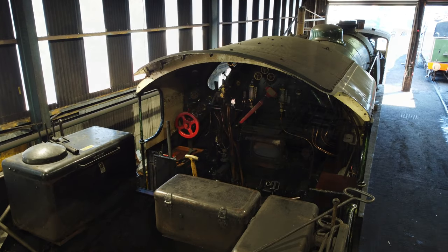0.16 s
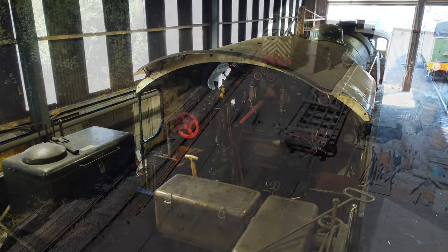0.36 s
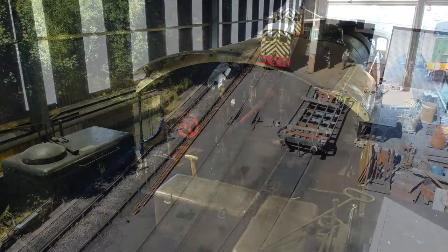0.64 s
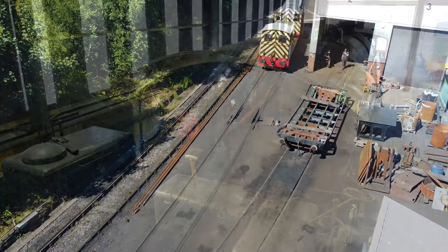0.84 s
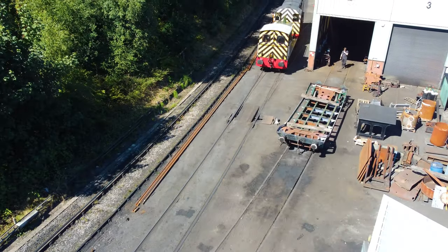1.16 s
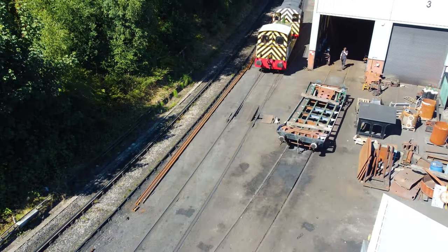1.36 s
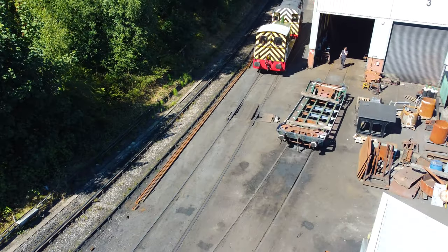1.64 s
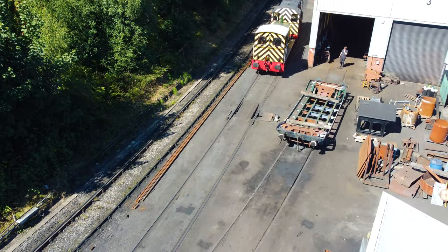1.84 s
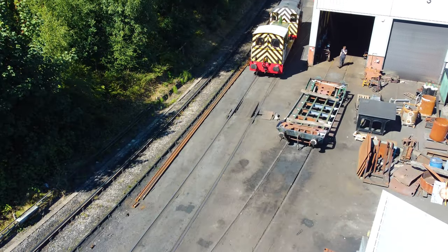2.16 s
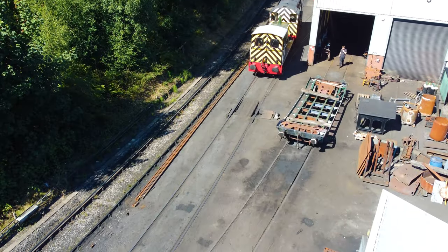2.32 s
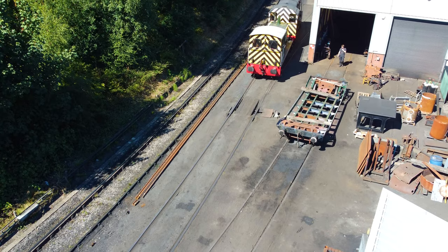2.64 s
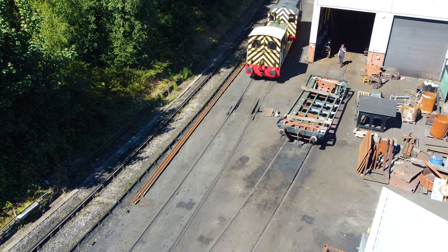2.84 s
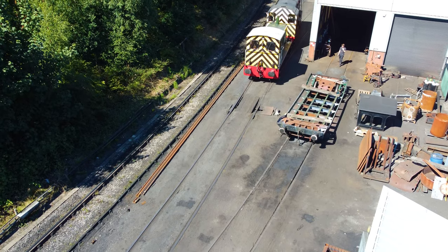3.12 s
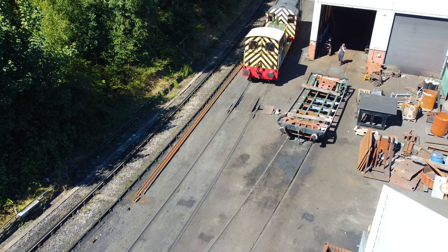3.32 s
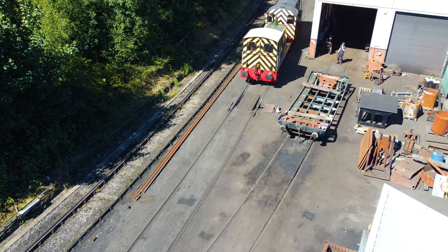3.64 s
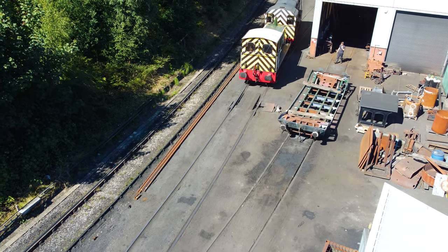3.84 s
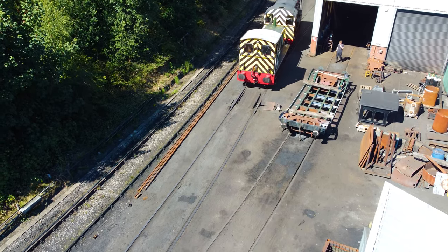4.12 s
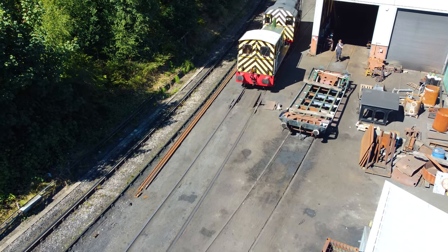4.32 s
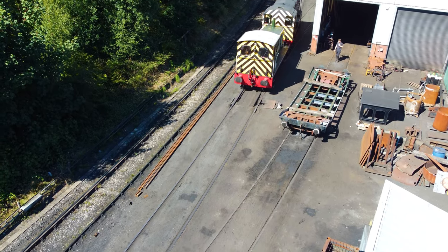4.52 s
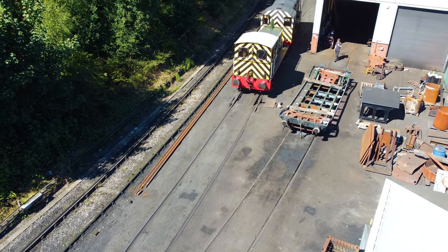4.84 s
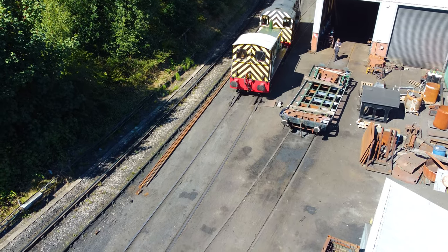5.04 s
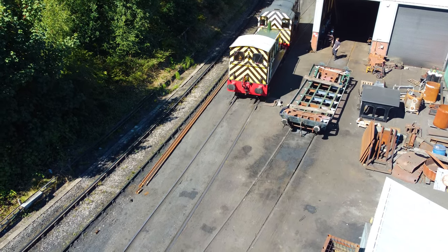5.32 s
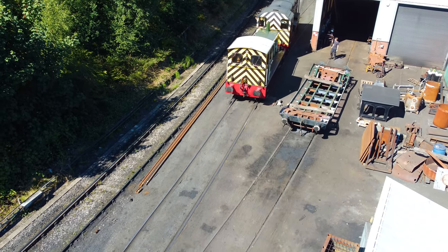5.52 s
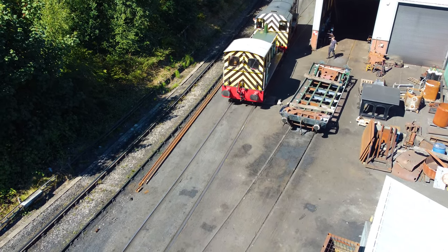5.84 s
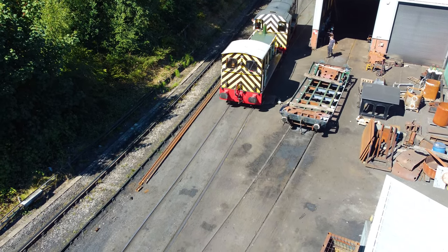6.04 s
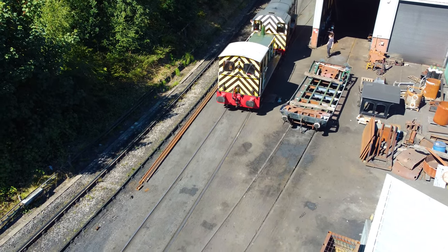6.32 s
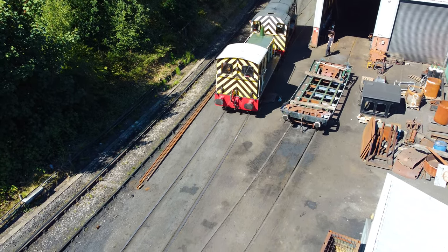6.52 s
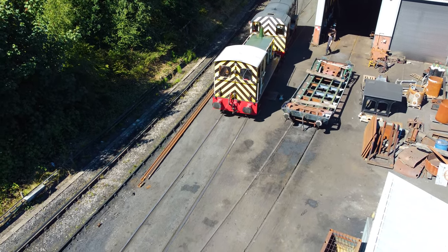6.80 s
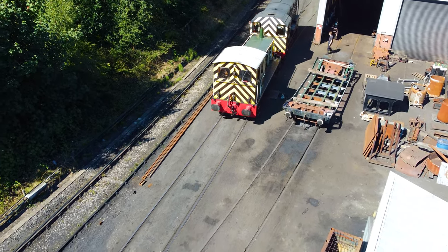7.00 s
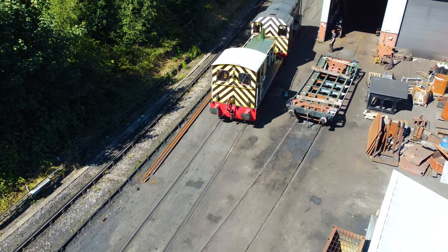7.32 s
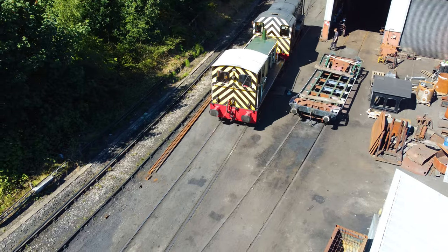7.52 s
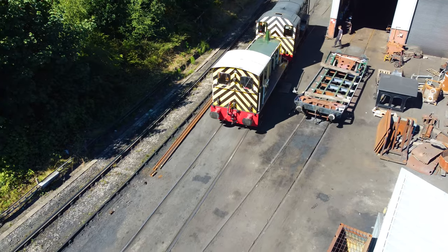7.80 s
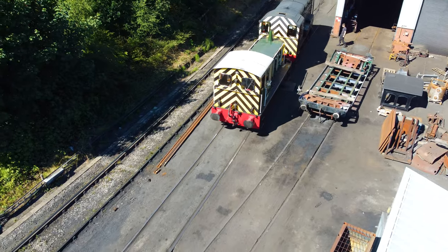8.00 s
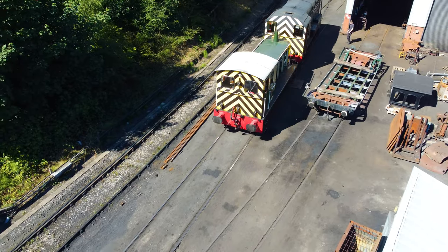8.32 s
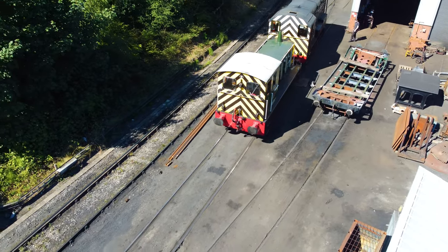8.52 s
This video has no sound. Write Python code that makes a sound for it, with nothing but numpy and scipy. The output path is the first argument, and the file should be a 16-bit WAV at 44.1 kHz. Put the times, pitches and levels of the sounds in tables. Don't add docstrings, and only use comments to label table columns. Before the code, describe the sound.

From 0 s there is only quiet, coloured shed air, fading out by 1 s. Tiny steel clicks begin around 0.15 s, growing firmer near 0.55 s, with a short soft scrape of gravel at about 0.5 s. Meanwhile a small diesel shunter swells in, established by roughly 1 s. It turns slowly, about seventeen uneven firings a second, a deep pipe throb under a rough low roar, with hollow silencer thumps, mid-pitched knocks, soft stack chuffs and light panel taps. Coupling clicks cluster until 2.9 s, then become sparse. A thin gear whine comes and goes until about 6.1 s; very faint, high belt chirps repeat about nine times a second. At 8.1 s air leaks, opening at 8.18 s into a loud whistling hiss, sagging and shutting near 8.36 s with a short ringing tail over the engine. One microphone, widened to stereo; deep bass and treble sit left.

```python
import sys
import numpy as np
from scipy import signal
from scipy.fft import rfft, irfft, next_fast_len
from scipy.io import wavfile
from scipy.ndimage import uniform_filter1d

SR = 44100
rng = np.random.default_rng(int(sys.argv[2]) if len(sys.argv) > 2 else 0)


def natural_amplitude(level_db):
    exponent = np.asarray(level_db, float) / 20
    return 10 ** exponent


def master(y):
    cut = np.clip(np.atleast_2d(y).T, -1, 1)
    pcm = np.round(cut * 32767)
    wavfile.write(sys.argv[1], SR, pcm.astype(np.int16))


N = 381906
T = np.arange(N) / SR

CYCLE_HZ = 2.796
LEAK_S, OPEN_S = 8.09, 8.176
# lag in firing gaps, pipe level in dB, casing level in dB.
FIRINGS = [(0.214, -6.0, -2.4), (0.447, -2.5, -0.9), (0.189, -0.6, 0.6), (0.407, -3.5, 3.3),
           (0.224, -2.1, -0.2), (0.208, -7.0, -2.4), (0.168, -4.0, -1.1), (0.386, -2.0, -2.1),
           (0.146, 0.1, 0.2), (0.381, 1.0, -0.4), (0.229, -3.7, 1.1), (0.201, -9.0, 0.8)]
# start in seconds, peak in dB, frequency in Hz.
THUMPS = [(0.74, -22.5, 164.2), (0.81, -24.5, 184), (1.042, -23.5, 147.6), (1.101, -23.5, 148.4),
          (1.458, -23, 151), (1.524, -22.5, 161), (2.022, -24.5, 158), (2.148, -27.5, 165),
          (2.249, -23.5, 154), (2.308, -25, 137), (2.527, -27.5, 150), (2.602, -19.5, 145.4),
          (2.826, -25.5, 123), (2.972, -22, 141), (3.168, -25, 184.3), (3.251, -24, 168),
          (3.381, -22.5, 175), (3.536, -21, 159), (3.677, -22, 152.5), (4.037, -18.5, 147),
          (4.146, -35, 139), (4.433, -19.5, 162), (4.574, -26.5, 137), (4.783, -24.5, 133),
          (4.857, -23, 153.6), (5.073, -26.5, 159), (5.187, -24, 158), (5.305, -26.5, 183),
          (5.528, -23, 182), (5.858, -24, 162), (5.987, -27, 140.5), (6.242, -24.5, 139.4),
          (6.458, -26, 151), (6.574, -24.5, 164.5), (7.107, -27.5, 175), (7.288, -22.5, 145),
          (7.419, -36, 177), (7.772, -28, 173), (8.326, -20.5, 150.7), (8.437, -25.5, 144)]
# start in seconds, peak in dB, frequency in Hz.
KNOCKS = [(0.592, -25, 522), (1.099, -28.5, 595), (1.125, -26, 510), (1.244, -27, 509), (1.316, -21, 506),
          (1.562, -26, 501), (1.631, -29, 501), (1.889, -32, 614), (1.958, -27, 530), (2.024, -23, 507),
          (2.069, -27, 510), (2.136, -34, 616), (2.197, -26, 538), (2.359, -28, 490), (2.389, -25, 613),
          (2.673, -36, 511), (2.753, -22, 501), (2.929, -23.5, 540), (3.11, -26, 506), (3.465, -26, 533),
          (3.646, -28, 533), (3.745, -26, 554), (3.824, -27, 504), (3.95, -24.5, 497), (4.031, -29.5, 610),
          (4.309, -25, 510), (4.431, -27, 528), (4.536, -27.5, 533), (4.745, -29.5, 509),
          (4.782, -28.5, 517), (4.877, -29, 546), (5.251, -27.5, 527), (5.579, -26, 501), (5.817, -28, 614),
          (5.89, -28, 540), (5.932, -27, 501), (5.965, -28, 589), (6.155, -23, 533), (6.357, -26.5, 504),
          (6.416, -28, 587), (6.484, -26, 587), (6.657, -26, 565), (6.697, -27, 538), (6.782, -24, 504),
          (6.869, -24, 490), (6.968, -25, 530), (7.035, -23, 501), (7.19, -28, 565), (7.452, -28, 519),
          (7.506, -27.5, 638), (7.601, -23, 546), (7.629, -29, 528), (7.736, -29, 649), (7.793, -28, 503),
          (7.906, -22.5, 554), (7.955, -28, 533), (8.037, -25, 501), (8.147, -30, 738), (8.27, -25, 514),
          (8.603, -25.5, 549)]
# start in seconds, peak in dB, frequency in Hz.
TAPS = [(0.6782, -40, 1610), (1.0952, -38, 1920), (1.176, -38, 1600), (1.2424, -37, 1650),
        (1.2763, -38, 1600), (1.3262, -35, 1620), (1.4424, -35, 1600), (1.4813, -34, 2150),
        (1.5946, -41, 1670), (2.2246, -38, 1640), (2.2635, -39, 1770), (2.3788, -35, 2340),
        (2.519, -37, 1700), (2.5604, -41, 1620), (3.386, -38, 1610), (3.5372, -35, 1910),
        (3.5781, -33, 1580), (3.8814, -37, 1600), (3.9088, -39, 1670), (4.1543, -39, 1590),
        (4.2056, -40, 1610), (4.8801, -37, 1860), (5.0437, -39, 1740), (6.1318, -40, 1620),
        (6.1846, -38, 1660), (6.2146, -45, 1630), (6.3238, -40, 1640), (6.6556, -41, 1620),
        (7.7381, -38, 1630), (7.801, -40, 1650), (8.1372, -33, 1630)]
# start in seconds, peak in dB, frequency in Hz.
CHUFFS = [(0.587, -29.5, 250), (0.928, -32, 319), (1.404, -25.5, 233), (1.447, -26, 283), (1.828, -27, 216),
          (2.089, -25, 215), (2.118, -26, 224), (2.187, -23, 245), (2.68, -25, 205), (2.809, -23, 194),
          (3.069, -19.5, 204), (3.59, -21.5, 200), (3.644, -24, 274), (4.36, -23, 260), (4.495, -25.5, 221),
          (4.637, -29.5, 270), (4.851, -25, 277), (4.942, -28, 199), (5.127, -28.5, 237), (5.181, -24, 192),
          (5.265, -25, 237), (5.438, -20, 192), (5.474, -24, 225), (5.601, -23, 218), (5.785, -23, 275),
          (5.927, -20.5, 207), (6.066, -24.5, 217), (6.177, -25, 229), (6.279, -22.5, 274),
          (6.548, -24.5, 223), (6.638, -25, 211), (6.746, -28, 266), (6.995, -23, 272), (7.353, -24, 207),
          (7.617, -31, 223), (7.704, -26, 274), (7.839, -26, 196), (7.977, -24, 223), (8.065, -26, 226),
          (8.334, -25, 216)]


def evened(x):
    return x / np.sqrt(np.mean(x ** 2) + 1e-20)


def read(points, hz):
    f, value = np.transpose(points)
    return np.interp(np.log(hz + 1), np.log(f + 1), value)


def curve(rows, t):
    s, *columns = np.transpose(rows)
    return [np.interp(t, s, c) for c in columns]


def colour(x, gain):
    size = next_fast_len(len(x))
    return irfft(rfft(x, size) * gain(np.fft.rfftfreq(size, 1 / SR)), size)[:len(x)]


def resonate(x, hz, width_hz):
    turn = np.exp(2j * np.pi * np.cumsum(hz * np.ones(len(x))) / SR)
    r = np.exp(-np.pi * width_hz / SR)
    return 2 * (turn * signal.lfilter([1 - r], [1, -r], x / turn)).real


def band_noise(hz, width_hz, second_width_hz):
    first = resonate(rng.standard_normal(N), hz, width_hz)
    return evened(resonate(first, hz, second_width_hz))


def band_of(x, lo_hz, hi_hz):
    return colour(x, lambda hz: 1 / (1 + (lo_hz / (hz + 1)) ** 8) / (1 + (hz / hi_hz) ** 8))


def peaks(modes):
    def gain(f):
        return sum(natural_amplitude(db) * np.sqrt(2 * SR / (np.pi * w)) / (1 + (2 * (f - hz) / w) ** 2)
                   for hz, w, db in modes)
    return gain


def drift(per_s):
    return evened(colour(rng.standard_normal(N), lambda hz: 1 / (1 + (hz / per_s) ** 2)))


def hush():
    # frequency in Hz, density in dB per Hz.
    hush_spectrum = [(12, -37), (20, -11), (60, 3), (123, -14), (205, 0), (254, -18), (390, -2.5),
                     (500, -4), (580, -13), (871, -16), (1300, -10), (1450, -18), (1660, -6), (1890, -18),
                     (3000, -28.5), (7500, -38), (8500, -42), (12000, -47), (15600, -84), (22000, -120)]
    hum = evened(colour(rng.standard_normal(N), lambda hz: natural_amplitude(read(hush_spectrum, hz))))
    return natural_amplitude(-50) * hum * np.clip(1 - (T - .15) / 0.85, 0, 1)


def clicks():
    # start in seconds, peak in dB, ring frequency in Hz, 60 dB decay in seconds.
    couplings = [(.145, -55, 7600, .05), (.298, -52, 5400, .03), (.33, -56, 7200, .05),
                 (.43, -50, 8500, .04), (.355, -50, 9000, .03), (.47, -43, 5000, .03),
                 (.512, -48, 6500, .03), (.555, -42, 4500, .03), (.546, -35, 4540, 0.039),
                 (1.095, -34, 3140, .05), (1.11, -39, 3200, .04), (1.176, -38, 2800, .03),
                 (1.505, -38, 2200, .04), (1.675, -34, 2300, 0.045), (1.386, -45, 6500, .04),
                 (1.205, -44, 3940, 0.027), (1.484, -36, 2060, 0.083), (1.641, -37, 2900, 0.036),
                 (1.773, -38, 4020, .06), (1.904, -39, 4560, 0.027), (1.978, -45, 2980, 0.035),
                 (2.381, -36, 1700, 0.05), (2.382, -41, 4440, 0.25), (2.383, -46, 6100, .05),
                 (2.571, -40, 3500, 0.035), (2.648, -43, 5000, 0.036), (2.719, -34, 4200, 0.046),
                 (2.72, -35, 2500, .04), (2.732, -34, 3900, 0.037), (2.733, -32, 2300, .04),
                 (2.736, -43, 6500, 0.22), (2.862, -38, 3480, 0.061), (3.17, -46, 5000, .1),
                 (4.56, -46, 4470, 0.32), (4.63, -40, 2600, .04), (4.767, -48, 2400, .04),
                 (6.969, -46, 8200, 0.034), (7.53, -41, 3150, .06), (4.833, -45, 3110, .04),
                 (6.383, -44, 2560, .04), (7.834, -38, 3070, .04), (8.099, -38, 3130, .04)]
    out, t = np.zeros(N), T[:8000]
    grits = rng.standard_normal((len(couplings), len(t)))
    for (s, db, hz, t60), grit in zip(couplings, grits):
        snap = np.roll((grit + 6 * (t == 0)) * natural_amplitude(-60 * t / .006), 66)
        tick = colour(snap, lambda f: (f > 1500) / (1 + (f / (1.3 * hz + 600)) ** 10))
        tick = tick * np.minimum(t / .0012, 1) * natural_amplitude(-60 * t / .05)
        ring = evened(resonate(resonate(grit, hz, 1100.), hz, 1100.))
        ring = ring * natural_amplitude(-60 * t / t60) * np.minimum(t / .002, 1) * (1 - t / t[-1])
        part = out[round((s - .0015) * SR):][:len(t)]
        part += natural_amplitude(db) * (0.87 * tick / abs(tick).max() + 0.25 * ring)[:len(part)]
    return out


def fade():
    start_s, lag_s, bend, floor_db, yard_db = 0.18, 0.24, 1.64, -38, -.5
    rise = 1 - np.exp(-np.maximum(T - start_s, 0) / lag_s)
    return natural_amplitude(yard_db) * np.maximum(rise ** bend, natural_amplitude(floor_db))


def crank():
    # time in seconds, lead on a steady turn in cycles.
    crank_lead = [
        (0.3, -0.032),
        (1.8, -0.023),
        (2.8, -0.043),
        (4.1, -0.039),
        (5.0, -0.027),
        (5.8, -0.034),
        (6.5, -0.023),
        (8.3, -0.022),
    ]
    return CYCLE_HZ * T + curve(crank_lead, T)[0]


def exhaust(cycles, count, luck):
    pipe_hz, width_hz = 59.9, 13.5
    lag, pipe_db, _ = np.transpose(FIRINGS)
    slot = count % len(lag)
    pulses = np.zeros(N)
    at = np.interp(count + lag[slot] + .012 * luck[:, 0], cycles * 6, np.arange(N))
    pulses[(at + SR / pipe_hz).astype(int)] = natural_amplitude(pipe_db[slot] + 0.82 * luck[:, 1])
    pipe = evened(resonate(resonate(pulses, pipe_hz, width_hz), pipe_hz, width_hz))
    return natural_amplitude(-27) * colour(pipe, lambda hz: 1 / (1 + (hz / 78) ** 6))


def shaft(cycles):
    # multiple of the cycle, rms level in dB.
    harmonics = [(6, -39.5), (12, -33.3)]
    out = np.zeros(N)
    for k, db in harmonics:
        level = natural_amplitude(db + 2.6 * drift(1.7)) * np.sqrt(2)
        out += level * (-1) ** (k // 6) * np.cos(2 * np.pi * k * cycles)
    return out


def rattle(cycles):
    # frequency in Hz, share of power locked to the crank.
    locked_share = [(60, .3), (90, .4), (160, .55), (300, .7), (500, .55), (800, .3), (1300, .05),
                    (3000, .0)]
    period = round(2 * SR / CYCLE_HZ)
    locked = rng.standard_normal(period)[(cycles / 2 * period).astype(int) % period]
    fresh = rng.standard_normal(N)
    shake = colour(locked, lambda hz: np.sqrt(read(locked_share, hz)))
    return shake + colour(fresh, lambda hz: np.sqrt(1 - read(locked_share, hz)))


def roar(cycles, shake):
    # frequency in Hz, density in dB per Hz.
    roar_spectrum = [(52, -35), (88, 1.5), (92, -9.5), (134, -2.5), (160, 0.5), (272, -5), (318, -7),
                     (360, -5.5), (398, -7), (493, -7), (669, -16), (1300, -27), (1690, -44), (2860, -120)]
    # low edge in Hz, high edge in Hz, swell in dB, crank angle of the swell in turns.
    surges = [
        (120, 230, 1.5, 0.38),
        (200, 230, 1., 0.43),
        (320, 560, 1, 0.6),
        (620, 840, 0.2, .65),
    ]
    noise = natural_amplitude(-27.5) * evened(colour(shake, lambda hz: natural_amplitude(read(roar_spectrum, hz))))
    for lo_hz, hi_hz, db, turn in surges:
        swell = natural_amplitude(db * np.cos(2 * np.pi * (cycles - turn)))
        noise = noise + band_of(noise, lo_hz, hi_hz) * (swell - 1)
    return noise


def valve_gear(cycles):
    # frequency in Hz, density in dB per Hz.
    fizz_spectrum = [(760, -41), (1300, -5.5), (1700, 1), (2380, -9), (3130, -12), (3510, -13),
                     (5850, -22.5), (7480, -20.5), (8290, -23), (9090, -29.5), (9370, -24.5),
                     (10300, -26.5), (11300, -35), (12000, -32), (15000, -44)]
    # frequency in Hz, width in Hz, rms level in dB.
    panels = [(3110, 90, -67.5), (7200, 90, -82.5), (10200, 400, -80.5)]
    firing_db = 0.76 * np.exp(-(cycles * 6 % 1) / .3)
    cycle_db = 0.4 * np.cos(2 * np.pi * (cycles - .63))
    knock = natural_amplitude(firing_db + cycle_db + 0.8 * drift(25.))
    fizz = colour(rng.standard_normal(N) * evened(knock), lambda hz: natural_amplitude(read(fizz_spectrum, hz)))
    contacts = natural_amplitude(3.8 * np.minimum(rng.exponential(1, N), 4)) * (rng.random(N) < 250 / SR)
    clatter = resonate(resonate(contacts, 1840.0, 700.), 1740.0, 700.)
    clatter += 1.8 * resonate(resonate(contacts, 1120.0, 450.), 1120.0, 450.)
    fizz = natural_amplitude(-49) * (evened(fizz) + natural_amplitude(-6.5) * evened(clatter))
    return fizz + colour(rng.standard_normal(N), peaks(panels))


def casing(load_db, shake):
    # frequency in Hz, width in Hz, rms level in dB.
    casing_modes = [(153.8, 7.6, -49.5), (267.7, 4.4, -49.5), (488, 4.3, -59.5), (533, 20, -56)]
    return colour(shake, peaks(casing_modes)) * natural_amplitude(2.0 * load_db + 0.61 * drift(1.0))


def bonnet(cycles, count, luck, shake):
    # frequency in Hz, width in Hz, level in dB.
    bonnet_modes = [(348.1, 4.2, -3), (364, 4.4, 5.5)]
    drum_by_firing = [-31, -36, -47, -30, -28.5, -34.5, -46, -35, -54, -32, -35.5, -36.5]
    # time in seconds, gain of the reflecting walls in dB.
    walls_gain = [
        (.5, 1),
        (2.6, -4),
        (4.0, 2.5),
        (5.3, 3.5),
        (6.3, -0.5),
        (7.4, 1.3),
        (8.6, -3.5),
    ]
    drum = colour(shake, peaks(bonnet_modes))
    drum /= np.sqrt(uniform_filter1d(drum ** 2, 6000) + 1e-3)
    drum_db = np.array(drum_by_firing)[count % len(FIRINGS)] + 0.5 * luck[:, 0]
    lag = -0.088
    return drum * natural_amplitude(np.interp(cycles * 6, count + lag, drum_db) + curve(walls_gain, T)[0] - 4.0)


def rumble():
    def gain(hz):
        return (hz / 16) ** 3 / (1 + (hz / 16) ** 3) / (1 + (hz / 65) ** 6)
    return natural_amplitude(-34.5) * evened(colour(rng.standard_normal(N), gain))


def engine():
    cycles = crank()
    count = np.arange(int(cycles[-1] * 6))
    luck = rng.standard_normal((len(count), 2))
    casing_db = np.transpose(FIRINGS)[2]
    load_db = np.interp(cycles * 6 % 12, np.arange(12) + .7, casing_db, period=12)
    shake = rattle(cycles) * natural_amplitude(0.2 * load_db + .5 * drift(1.5))
    out = exhaust(cycles, count, luck) + shaft(cycles) + roar(cycles, shake) + valve_gear(cycles)
    return out + casing(load_db, shake) + bonnet(cycles, count, luck, shake) + rumble()


def belt():
    # time in seconds, squeak level in dB, lag in seconds.
    labour = [(.6, 0, -.003), (1.3, 1, -.004), (2.6, 2, .002), (3.2, 2.5, .008), (3.7, 0.5, .012),
              (4.4, 0, .004), (4.85, 3, 0), (5.2, -1, .001), (6.2, -2, -0.0013), (6.6, 2, -.002),
              (7.1, 1, -.002), (7.6, 4, -.008), (8.1, 4.5, -0.00018)]
    level_db, lag = curve(labour, T)
    turns = 9.163 * (T - lag) - 0.68
    size = natural_amplitude(1.8 * rng.standard_normal(int(turns[-1]) + 3))[(turns + 1).astype(int)]
    gate = (turns % 1) / .12 * np.exp(1 - (turns % 1) / 0.14) * size
    squeak = band_noise(8830, 70., 110.)
    squeak /= np.sqrt(uniform_filter1d(squeak ** 2, size=900) + .3)
    puff = band_noise(10150, 400., 400.)
    chirp = evened(squeak * gate) + natural_amplitude(-9) * evened(puff * gate)
    return natural_amplitude(-71 + level_db) * chirp * (T < OPEN_S)


def scuff():
    # full level at in seconds, level in dB, rise in seconds, hold in seconds.
    scuffs = [
        (0.39, -66.5, .12, .08),
        (0.498, -57.5, 0.027, 0.054),
    ]
    band = colour(rng.standard_normal(N), lambda hz: 1 / (1 + ((hz - 5000) / 1600) ** 2))
    drag = np.zeros(N)
    for s, db, rise, hold in scuffs:
        fall_db = 350 * np.maximum(T - s - hold, 0)
        drag += np.clip((T - s) / rise + 1, 0, 1) * natural_amplitude(db - fall_db)
    return evened(band) * drag


def whine():
    # start in seconds, length in seconds, level in dB.
    pulls = [(.56, 0.33, -60), (1.2, 0.29, -54), (1.97, 0.13, -54), (2.28, .38, -52.5), (2.72, 0.15, -48.5),
             (3.72, 0.31, -54.5), (4.18, 0.14, -57), (4.38, .14, -56), (5.0, 0.13, -59), (5.49, .1, -57),
             (5.74, 0.15, -56), (6.02, .13, -58)]
    edge_s, idle_db = 0.05, -66
    tone = band_noise(1536, 9., 9.)
    tone = tone / np.sqrt(uniform_filter1d(tone ** 2, size=3000) + 0.12)
    pull = np.zeros(N)
    for s, length, db in pulls:
        pull += natural_amplitude(db) * np.clip(np.minimum(T - s, s + length - T) / edge_s + .5, 0, 1)
    idle = natural_amplitude(idle_db) * fade() * (T < sum(pulls[-1][:2]))
    return natural_amplitude(-2) * tone * (pull + idle)


def blows(rows, rise_s, t60, trim_db):
    out, t = np.zeros(N), T[:6000]
    for s, db, hz in rows:
        ring = natural_amplitude(db + trim_db - 60 * t / t60) * np.minimum(t / rise_s, 1) * np.sin(2 * np.pi * hz * t)
        part = out[round(s * SR):][:len(t)]
        part += ring[:len(part)]
    return out


def lull(x, rows, before_s, after_s, lo_hz, hi_hz, depth):
    marks = np.zeros(N)
    for s, *_ in rows:
        marks[round((s - before_s) * SR):round((s + after_s) * SR)] = depth
    return x - band_of(x, lo_hz, hi_hz) * uniform_filter1d(marks, size=200)


def knocks():
    early = np.subtract(KNOCKS, [.0025, 0, 0])
    crack = early * [1, 1, 1.4]
    return blows(early, 0.0026, 0.05, 3.5) + blows(crack, 0.0023, 0.031, -6)


def pressure():
    rise_s, shut_s, shut_db_per_s = 0.025, 8.36, 256
    leak = natural_amplitude(-48.5 - 100 * (T - LEAK_S)) * np.clip((T - LEAK_S) / 0.013, 0, 1)
    after = np.maximum(T - shut_s, 0)
    closing = natural_amplitude(-shut_db_per_s * after)
    tail = closing + natural_amplitude(-9 - 61 * after) * (1 - closing)
    bleed = natural_amplitude(-23.5 - 45.5 * np.clip(T - OPEN_S - rise_s, 0, shut_s - OPEN_S - rise_s))
    return leak + np.clip((T - OPEN_S) / rise_s, 0, 1) * bleed * tail


def air():
    # frequency in Hz, density in dB per Hz.
    jet_spectrum = [(260, -45), (450, -7), (499, -7), (802, -0.5), (1090, 1), (1290, -2), (1700, 2),
                    (2230, -4.5), (2580, -6.5), (3320, -0.5), (4960, -7), (6000, -9), (7500, -4.5),
                    (8320, -12.5), (12100, -18), (15500, -34)]
    # frequency in Hz, width in Hz, level in dB.
    nozzle = [
        [(1830, 50, -1), (2018, 25, -6), (2270, 23, -6), (3220, 23, -1), (3370, 30, -4), (3643, 20, -8),
         (3810, 23, 2), (4050, 36, -7), (4560, 39, -5), (5310, 32, -15), (5755, 30, -10), (6280, 69, -12),
         (6555, 25, -6), (7050, 25, -13)],
        [(1140, 100, 4), (1370, 23, -4), (1580, 34, 0), (1745, 30, 0), (2160, 18, -4), (2280, 19, 2),
         (2940, 42, 0), (3385, 37, 0), (3830, 51, -7), (4345, 40, -9), (4720, 41, -2), (5710, 40, -12),
         (6160, 45, -6)],
        [(1105, 64, 2), (1530, 200, -7), (2135, 31, -3), (3370, 44, -4), (3810, 39, -2), (4040, 50, 1),
         (4345, 40, -3), (4570, 21, -10), (4980, 34, -9), (5730, 72, -13), (6220, 46, -5), (6560, 36, -7)],
    ]
    # centre in seconds, spread in seconds, level in dB.
    singing = [
        (8.215, 0.039, -12.5),
        (8.285, 0.029, -11.5),
        (8.38, 0.083, -11.5),
    ]
    jet = evened(colour(rng.standard_normal(N), lambda hz: natural_amplitude(read(jet_spectrum, hz))))
    walls = rng.standard_normal(900) * (rng.random(900) < .03) * natural_amplitude(-25. - 8. * np.arange(900) / 900)
    walls[0] = 1
    jet = evened(signal.oaconvolve(jet, walls)[:N])
    start = round(LEAK_S * SR)
    t = T[start:]
    for modes, (s, spread, db) in zip(nozzle, singing):
        hz, width, mode_db = np.transpose(modes)[:, :, None]
        wander = np.cumsum(rng.standard_normal((len(modes), len(t))), axis=1) * np.sqrt(1.54 * width / SR)
        tones = (natural_amplitude(mode_db) * np.sin(2 * np.pi * hz * t + wander)).sum(0) * np.sqrt(2)
        jet[start:] += natural_amplitude(db) * np.exp(-((t - s) / spread) ** 2 / 2) * tones
    dull = colour(jet, lambda hz: natural_amplitude(-12.5 * abs(np.log2(np.clip(hz, 1400, 4400) / (hz + 1)))))
    spent = np.clip((T - 8.2) / 0.42, 0, 1)
    jet = (1 - spent) ** 2 * jet + (1 - (1 - spent) ** 2) * dull
    return jet * pressure()


def scene():
    running = lull(engine(), THUMPS, 0.026, .07, 133.0, 176.0, 0.49)
    running = lull(running, KNOCKS, 0.0096, 0.013, 480.0, 810.0, 0.73)
    running = lull(running, CHUFFS, .015, .04, 226.0, 286.0, 0.46)
    running = lull(running, TAPS, .006, .006, 1350.0, 2300.0, 0.39)
    mono = (running + belt()) * fade() + whine() + scuff() + air() + hush() + clicks()
    mono += blows(THUMPS, 0.0076, 0.26, 0.5) + blows(CHUFFS, 0.0066, .18, 0.1)
    mono += blows(TAPS, .0015, 0.037, -1.0) + knocks()
    return np.array([mono, mono])


def starve(x):
    # frequency in Hz, chance of a dropped tile from 0 to 1.
    drop_chance = [(10650, .0), (10950, .75), (11250, .65), (11550, .06), (12400, .03), (12700, .85),
                   (13100, .9), (13500, .2), (14300, .3), (14800, .8), (15200, .97)]
    hz, t, z = signal.stft(x, SR, nperseg=1024, noverlap=768)
    band, block = np.arange(len(hz)) // 6, np.arange(len(t)) // 8
    luck = rng.random((block[-1] + 1, band[-1] + 1))[block][:, band].T
    top = abs(z[hz > 9000]).sum(0)
    jump = top > 8 * np.roll(top, 9)
    lucky = luck > read(drop_chance, hz[band * 6 + 2])[:, None]
    keep = lucky | jump & (hz < 15700)[:, None]
    return signal.istft(z * keep, SR, nperseg=1024, noverlap=768)[1][:N]


def band_limit(x):
    return signal.sosfilt(signal.butter(12, 15710, fs=SR, output="sos"), x)


def record(dry):
    # frequency in Hz, turn of the side from the middle in radians.
    side_turn = [(120, 0), (132, -.5), (150, -1.75), (165, -1.93), (220, -1.95), (260, -2.17), (420, -2.2),
                 (860, -2.1), (920, -1.83), (1800, -1.35), (3200, -.98), (4000, -.46), (4600, -.14),
                 (4950, 0)]
    mid = starve(dry.mean(0))
    side = colour(mid, lambda hz: np.exp(1j * read(side_turn, hz)))
    side = colour(side, lambda hz: 1 - .04 / (1 + (hz / 150) ** 4))
    leak = natural_amplitude(-60.5) * evened(colour(mid[::-1], lambda hz: 1 / (1 + (hz / 110) ** 4)))
    return band_limit(np.array([mid + side, mid - side + leak]))


dry = scene()
out = record(dry)
master(out)
```